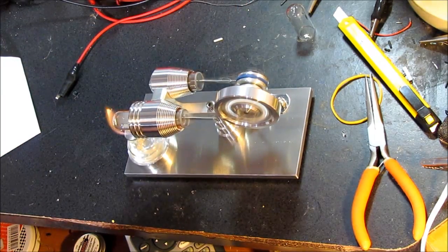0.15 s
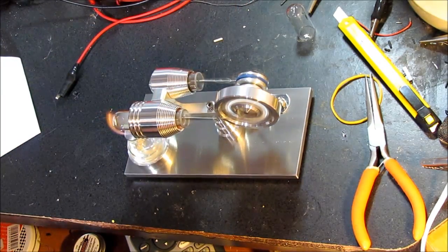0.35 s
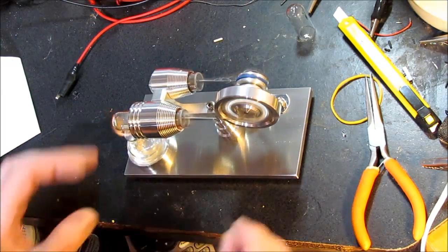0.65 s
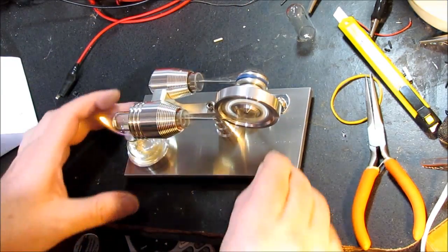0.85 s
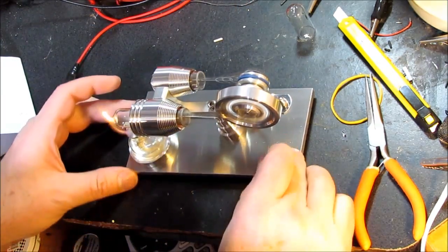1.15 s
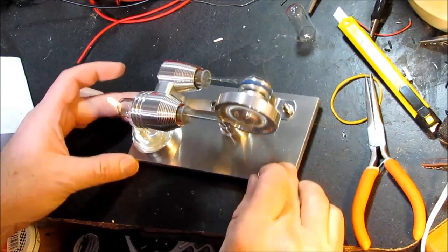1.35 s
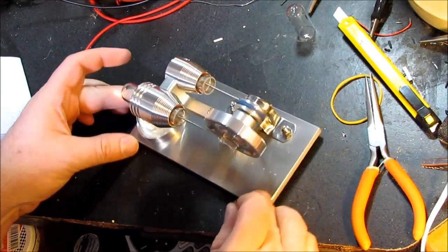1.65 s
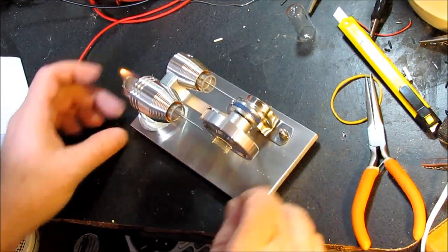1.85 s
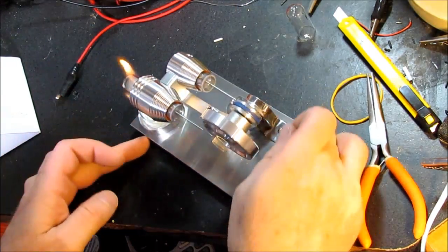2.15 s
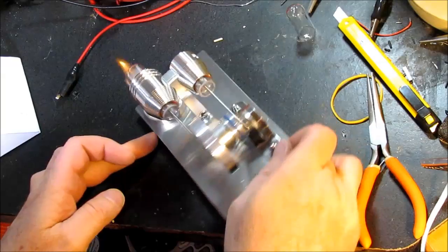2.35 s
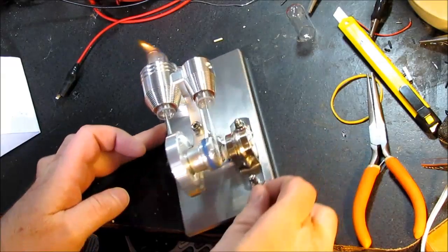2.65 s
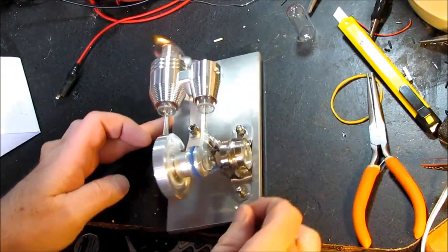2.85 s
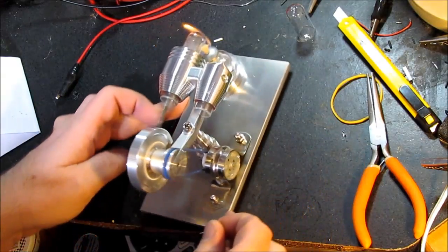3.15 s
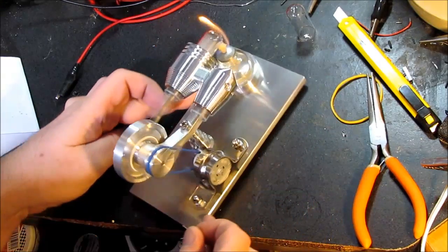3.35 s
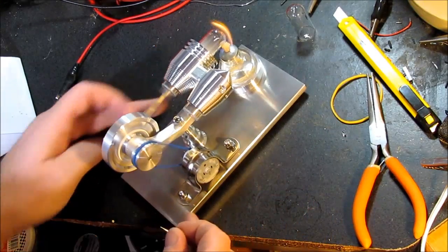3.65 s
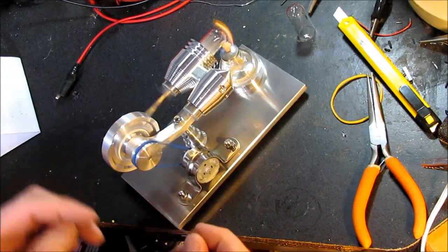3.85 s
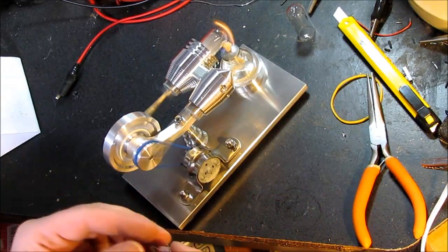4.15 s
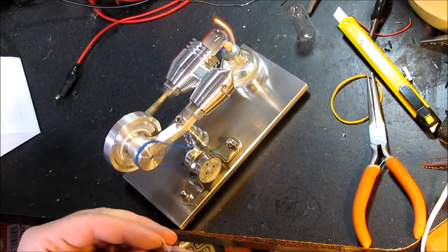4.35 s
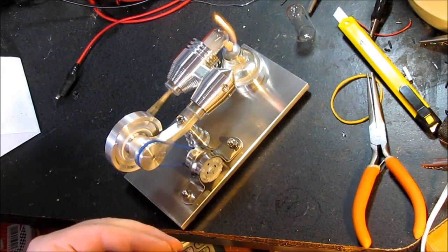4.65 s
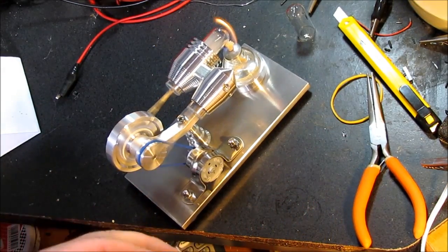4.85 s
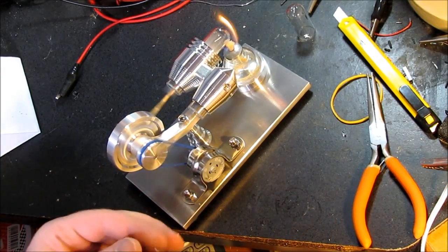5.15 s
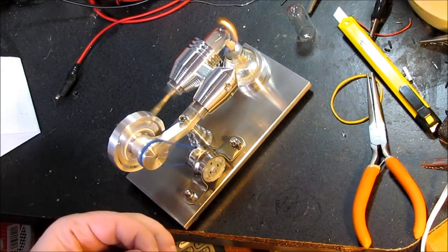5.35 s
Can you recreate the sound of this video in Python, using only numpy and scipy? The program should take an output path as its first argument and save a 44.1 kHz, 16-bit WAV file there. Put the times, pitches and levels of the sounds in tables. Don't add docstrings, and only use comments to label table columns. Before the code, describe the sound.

Fast, dry metallic chatter from a tiny running engine, with faint base scuffs, sharper loose knocks later, and a deepening bench hum.

```python
import sys
import numpy as np
from scipy import signal
from scipy.fft import rfft, irfft, next_fast_len
from scipy.io import wavfile
from scipy.ndimage import uniform_filter1d

SR = 44100
rng = np.random.default_rng(int(sys.argv[2]) if len(sys.argv) > 2 else 0)


def store_pcm(level_fs):
    pcm = np.round(np.clip(level_fs, -1, 1) * 32767).astype(np.int16)
    wavfile.write(sys.argv[1], SR, np.atleast_2d(pcm).T)


def nominal_scale(level):
    x = np.asarray(level, float) / 20
    return 10 ** x


N = 243476

# t/s, pose (0 side-on, 1 half way, 2 fully round)
SWING_ROUND = [(0, 0.1), (1.2, 0), (1.5, 0.66), (2.0, 0.87), (2.5, 1.1), (3.2, 1.4), (3.5, 2.02),
               (5.52, 1.88)]


def crank():
    # t/s, lead/turns
    crank_lead = [(0.0, 0.076), (0.5, 0.086), (1.2, 0.118), (2.4, 0.156), (3.2, 0.25), (4.0, 0.295),
                  (4.4, 0.244), (5.52, 0.039)]
    turns_per_s = 35.53
    return turns_per_s * np.arange(N) / SR + in_time(crank_lead)[0]


def clatter():
    frame_modes = [(133, 0.037, 1, 6, -26), (192, 0.014, 12, -17, 0), (300, 0.096, 1, -5, 2.5),
                   (378, 0.36, -5, -15, -0.5), (463, 0.049, 0.5, -1.5, 2), (530.2, 0.14, 7.5, 1, 6.5),
                   (598.5, 0.21, -5, -6.5, 1.5), (662, 0.043, -5, 0, 2), (774.4, 0.07, 5.5, 2, -0.5),
                   (1043, .025, 7, 5, 2), (1131.5, 0.18, 1, -24, -9), (1347, 0.026, 2, -44, -32)]
    base_modes = [(1480, 0.013, -25, -35, -34), (1582, 0.061, -6, -11, -12), (1907, 0.053, -1, -3.5, -3),
                  (2077, 0.032, 0, 9, 5), (2196, 0.031, 8, 1, 3), (2369, 0.063, 0, 4, 3),
                  (2530, 0.021, 8.5, 11, 6), (2714, 0.12, -2, -6, -18), (2255, 0.031, -19, -13, -9)]
    side_modes = [(3157, 0.02, -6, -5, 1.5), (3432, 0.018, 0.5, 2.5, 5), (3745, 0.033, -2.5, -6, 13),
                  (3960, 0.018, -9, -1.5, -4), (4251, 0.018, -2.5, -1, 8.5), (4970, 0.035, -11, -9, -45)]
    rod_modes = [(5270, 0.032, 6, -1, -2), (5430, 0.039, -23, -30, 0), (5580, 0.015, 21, -4, -9),
                 (5955, 0.012, 20.5, 7, -14), (6033, 0.052, -17, 2, -10), (6165, 0.05, 7.5, -3, -8.5),
                 (5820, 0.02, -3, 8, 1), (6460, 0.0061, 10, 7, -4), (7265, 0.034, 11, 6.5, -4.5)]
    pin_modes = [(11825, 0.016, 17, 17, 6), (12000, 0.034, 8, -13, 11), (11600, 0.018, -38, -28, -26),
                 (12300, 0.028, -39, 10, -23)]
    tick_modes = [(7650, 0.002, 12.5, 5.5, 3), (8530, 0.011, -3, -11.5, -18), (9165, 0.026, -1.5, -10, -20),
                  (9710, 0.0042, 7.5, -4.5, -8), (10550, 0.0067, -26, -6, -18),
                  (12700, 0.0038, -6, -5, -10), (14300, 0.0051, -5, -15, -23),
                  (15700, 0.004, -15, -17, -24)]
    base_db, rods_db, pin_db, tick_db = facing()
    frame = joints(column=1, modes=frame_modes, jitter_ms=.03, uneven_db=.5, bounce_db=-12, rub_db=-42, apart=.3)
    base = joints(column=2, modes=base_modes, jitter_ms=.035, uneven_db=1.0, bounce_db=-3, rub_db=-32, apart=.35)
    side = joints(column=3, modes=side_modes, jitter_ms=.07, uneven_db=2.2, bounce_db=-3, rub_db=-23, apart=.35)
    rods = joints(column=3, modes=rod_modes, jitter_ms=.09, uneven_db=2.2, bounce_db=-2, rub_db=-29, apart=.35)
    pin = joints(column=4, modes=pin_modes, jitter_ms=.1, uneven_db=1.8, bounce_db=-1, rub_db=-36, apart=.3)
    tick = joints(column=5, modes=tick_modes, jitter_ms=.12, uneven_db=2.0, bounce_db=-4, rub_db=-30, apart=.35)
    heavy = nominal_scale(-50.5) * frame + scattered(nominal_scale(base_db - 1.0) * base, amount=0.092)
    middle = scattered(nominal_scale(-38.5) * side + nominal_scale(rods_db) * rods, amount=0.54)
    light = scattered(nominal_scale(pin_db + 1.5) * pin + nominal_scale(tick_db + 2.0) * tick, amount=0.62)
    return heavy + middle + light + glints(np.mean(frame + side + rods, axis=0))


def joints(column, modes, jitter_ms, uneven_db, bounce_db, rub_db, apart):
    # crank angle/turns, frame/dB, base/dB, rods/dB, pin/dB, tick/dB
    joints_before = [(.03, -2, -4, -4, -4, -13), (.13, -2, -7, -3, -5, -15), (.27, -3, -6, -5, -11, -12),
                     (.47, -5, -9, -9, -9, 0), (.51, -9, 0, 0, -10, -8), (.67, -3, -3, -2, -14, -10),
                     (.73, -9, -3, -3, -16, -14), (.93, -6, -1, -3, 0, -7)]
    joints_after = [(.02, 0, -3, -4, -7, -5), (.12, -9, -8, -8, -10, -10), (.27, -10, -7, -7, -11, -6),
                    (.48, -12, -9, -10, 0, -2), (.51, -4, -1, 0, -7, -5), (.67, -9, -3, -1, -11, -4),
                    (.72, -9, -4, -1, -14, -8), (.94, -12, 0, -2, 0, -1)]
    before, after = np.array(joints_before), np.array(joints_after)
    turns, swing = crank(), np.clip(in_time(SWING_ROUND)[0], 0, 2)

    whole = np.arange(-1, int(turns[-1]) + 1)[:, None]
    swung = np.interp(whole, turns, swing)[..., None] / 2
    joint = before + swung * (after - before)
    angle = whole + joint[..., 0]
    inside = (angle > turns[0]) & (angle < turns[-1])
    luck = np.clip(rng.standard_normal(angle.shape), -2, 1.3)
    size = inside * nominal_scale(joint[..., column] + uneven_db * luck)

    habit_ms = np.cumsum(rng.uniform(.3, .9, (len(before), 5)), axis=1)
    habit = nominal_scale(np.r_[0, bounce_db - 2.5 * np.arange(4)]) * rng.choice([-1, 1], habit_ms.shape)
    scatter_ms = jitter_ms * np.cumsum(rng.standard_normal(angle.shape + (5,)), axis=2)
    delay_ms = habit_ms - habit_ms[:, :1] + scatter_ms
    at = np.interp(angle, turns, np.arange(N))[..., None] + delay_ms / 1000 * SR
    at = np.clip(at, 0, N - 1).astype(int).ravel()

    rub = nominal_scale(rub_db) * rng.standard_normal(N)
    rings, heard = [], []
    for hz, t60, *pose_db in modes:
        spot = nominal_scale(.8 * uneven_db * np.clip(rng.standard_normal(scatter_ms.shape), -2, 1.5))
        taps = np.bincount(at, (size[..., None] * habit * spot).ravel(), N)
        pointer = ring(rub + taps, hz, t60)
        gain = np.concatenate([nominal_scale(db) * ports(hz, apart) for db in pose_db])
        rings += [pointer.real, pointer.imag]
        heard += [gain.imag, gain.real]
    poses = (np.transpose(heard) @ np.array(rings)).reshape(3, 2, N)
    blend = sum(pose * np.maximum(1 - abs(swing - k), 0) for k, pose in enumerate(poses))
    return evened(around(blend, modes))


def facing():
    # pose, base/dB, rods/dB, pin/dB, tick/dB
    pose_levels = [(0, -34, -31.5, -34.5, -38), (.7, -35, -33, -38.5, -38),
                   (1.05, -35.5, -32.5, -37, -38.5), (1.27, -33.5, -32, -43.5, -38.5),
                   (1.45, -32.5, -31, -35, -40.5), (1.9, -36.5, -32.5, -39.5, -42)]
    # t/s, length/s, change/dB
    finger_grips = [
        (1.356, 0.47, -1),
        (3.46, 0.9, -2),
        (3.846, 0.33, 1),
    ]
    grip_share = [1.0, 0.48, 1, 0.17]
    swing = in_time(SWING_ROUND)[0]
    grip_db = sum(db * swell(s, length) for s, length, db in finger_grips)
    pose, *parts_db = np.transpose(pose_levels)
    return [np.interp(swing, pose, db) + share * grip_db for db, share in zip(parts_db, grip_share)]


def glints(struck):
    # t/s, length/s, f/Hz, time to die by 60 dB/s, level/dB
    beams = [
        (0.855, 0.31, 6165, 0.031, -39),
        (1.68, 0.46, 4310, 0.023, -45.5),
        (2.75, 0.5, 799, .12, -60),
        (2.9, 0.61, 1210, 0.092, -63),
        (3.113, 0.44, 533, 0.18, -53.5),
    ]
    out = 0
    for s, length, hz, t60, db in beams:
        tone = ring(ring(struck, hz, t60).real, hz, t60 / 2).real
        out = out + nominal_scale(db) * swell(s, length, power=4) * rms_one(tone)
    return out


def loose_part():
    # f/Hz, time to die by 60 dB/s, level/dB, family (0 own, 1 low, 2 mid)
    loose_modes = [(7322, 0.041, 3.5, 0), (7750, .04, -28, 0), (9070, 0.043, -4.5, 0), (9950, 0.002, 6, 0),
                   (8000, 0.0015, 8, 0), (3730, 0.022, 5, 1), (2830, 0.021, -1, 1), (6140, 0.024, 7.5, 2),
                   (5380, 0.015, 2, 2), (6670, 0.0031, 10, 2)]
    s, peak_db, low_db, mid_db = all_knocks().T
    family_db = [0, low_db, mid_db]
    at = (s * SR).astype(int)
    chance = rng.standard_normal((len(s), 2 + len(loose_modes)))
    later = at + ((.008 + 0.0009 * chance[:, 0]) * SR).astype(int)
    rebound_db = -5.5 + 3.0 * np.clip(chance[:, 1], -2, 1)
    out = 0
    for k, (hz, t60, level_db, family) in enumerate(loose_modes):
        size = nominal_scale(peak_db + family_db[int(round(family))] + level_db + 0.91 * chance[:, 2 + k])
        clicks = np.zeros(N + SR)
        clicks[at] = size
        clicks[at + round(.0007 * SR)] = size * nominal_scale(-23)
        clicks[later] = size * nominal_scale(rebound_db)
        phase = np.exp(2j * np.pi * rng.random())
        out = out + np.imag(phase * ports(hz, apart=0.27)[:, None] * ring(clicks[:N], hz, t60))
    return nominal_scale(-4.0) * signal.sosfilt(signal.butter(3, [2000, 14000], "band", fs=SR, output="sos"), out)


def all_knocks():
    # t/s, peak/dB, low ring/dB, mid ring/dB
    stray_knocks = [(0.8315, -32, -4, 7.5), (0.8874, -38, 0, 3), (1.18, -33, 8, 8), (1.211, -32, 2, 8),
                    (1.5239, -29.5, 1, 5), (1.956, -27, -9, -15), (2.5656, -29, -16, 10),
                    (2.5885, -24, -6, -9), (2.7437, -29.5, -2, 2), (2.8958, -21.5, -1.5, -10),
                    (3.052, -34, -16, -3), (3.1078, -34, 8, 7), (3.258, -17, -7.5, -6.5),
                    (3.3722, -17.5, -8.5, -4.5), (3.4575, -20.5, -7, -2), (3.5074, -26, -2, 7),
                    (3.5658, -20.5, -13, -2), (3.6516, -18, -10, -5), (3.7818, -26.5, -13, -22),
                    (4.8334, -28, 0, -4), (5.1781, -26, -10, -2)]
    # from/s, to/s, peak/dB, low ring/dB, mid ring/dB
    knock_spells = [(3.87, 4.16, -24, -9, -3), (4.16, 4.56, -22, -7.5, -4.5), (4.56, 4.77, -22.5, -18, -8),
                    (4.9, 5.06, -23.5, -5, -7), (5.06, 5.11, -22.5, -9, -4), (5.19, 5.51, -23.5, -4, -5)]
    knock_turns, scatter_turns = .98, .04
    peak_uneven_db, ring_uneven_db = 2.0, 4.0
    turns = crank()
    even = np.arange(0, turns[-1] - 1, 2)
    chance = np.clip(rng.standard_normal((len(even), 4)), -1.5, 1.5)
    s = np.interp(even + knock_turns + scatter_turns * chance[:, 0], turns, np.arange(N) / SR)
    uneven_db = chance[:, 1:] * [peak_uneven_db, ring_uneven_db, ring_uneven_db]
    rows = [np.c_[s, db + uneven_db][(s > start) & (s <= end)] for start, end, *db in knock_spells]
    return np.vstack([stray_knocks] + rows)


def bench_hum():
    angle = 2 * np.pi * crank()
    second_db, third_db, fourth_db = shaking()
    hum = nominal_scale(-64.5) * np.cos(angle + 5.6)
    hum += nominal_scale(second_db) * np.cos(2 * angle - 2.9)
    hum += nominal_scale(third_db) * np.cos(3 * angle - 3.0)
    hum += nominal_scale(fourth_db) * np.cos(4 * angle - 1.4)
    buzz = np.cos(5 * angle) + np.cos(7 * angle) + np.cos(8 * angle) + np.cos(10 * angle)
    hum += nominal_scale(-58 + 2.2 * (third_db + 43)) * buzz
    hum += nominal_scale(second_db - 26.5) * (np.cos(5 * angle + 1.2) + np.cos(6 * angle + 0.22))
    return np.sqrt(2) * hum * np.array([[.93], [1.0]])


def shaking():
    # from/s, to/s, multiple 2/dB, multiple 3/dB, multiple 4/dB
    seated_spells = [(1.13, 1.587, -57, -58, -66), (1.902, 1.986, -60, -68, -53),
                     (1.91, 2.33, -53.5, -50, -56.5), (2.784, 2.92, -63, -62, -66),
                     (3.36, 3.57, -50.5, -50.5, -64), (3.575, 3.81, -41.5, -43.5, -55),
                     (3.783, 3.893, -65, -65, -57), (3.83, 5.7, -41, -59, -61.5)]
    soft_feet_db, settle_s = [-65.5, -70.5, -90], 0.055
    wobble_db, wobbles_per_s = [.6, 2.0, 3.0], 9
    t = np.arange(N) / SR
    firm = 0
    for start, end, *db in seated_spells:
        contact = np.clip(.5 + np.minimum(t - start, end - t) / settle_s, 0, 1)
        firm = firm + np.outer(nominal_scale(db), contact)
    knots = np.arange(0, N / SR + 1, 1 / wobbles_per_s)
    wobble = [db * np.interp(t, knots, rng.standard_normal(len(knots))) for db in wobble_db]
    return 20 * np.log10(np.hypot(firm, nominal_scale(soft_feet_db)[:, None])) + wobble


def hands():
    # t/s, length/s, level/dB
    base_nudges = [(0.63, 0.043, -52), (0.857, 0.09, -50.5), (1.16, 0.05, -50), (1.21, 0.044, -52),
                   (2.216, .1, -53), (2.485, 0.053, -52), (3.266, 0.16, -58)]
    stroke = sum(nominal_scale(db) * swell(s, length) for s, length, db in base_nudges)
    grit = rng.standard_normal(N) * nominal_scale(6.7 * rng.standard_normal(N))
    return stroke * rms_one(signal.sosfilt(signal.butter(2, [130, 750], "band", fs=SR, output="sos"), grit))


def workshop(x):
    room_t60_s, wall_cut_hz = 0.28, 14000
    size = next_fast_len(N + SR)
    w = 2 * np.pi * np.arange(size // 2 + 1) / size
    dull = 1 / (1 + 1j * w * SR / (2 * np.pi * wall_cut_hz))
    wet = np.zeros((2, len(w)), complex)
    for k, lag in enumerate(rng.uniform(.003, .022, 12) * SR):
        loop = nominal_scale(-60 * lag / SR / room_t60_s) * dull * np.exp(-1j * w * lag)
        wet[k % 2] += loop / (1 - loop) * (-1) ** (k // 2)
    return irfft(wet * rfft(x.mean(axis=0), size), size)[:, :N] / 2


def room_tone():
    # f/Hz, level per Hz/dB
    air_spectrum = [(20, -1), (35, -4), (80, -2), (200, -9), (600, -8), (2000, -9.5), (9000, -34),
                    (15000, -43)]
    hz = np.maximum(np.arange(N // 2 + 1) * SR / N, 1)
    points = np.array(air_spectrum)
    gain = nominal_scale(np.interp(np.log(hz), np.log(points[:, 0]), points[:, 1], left=-40))
    mid, side = rfft(rng.standard_normal((2, N))) * gain
    side = side * np.clip(0.034 * (hz / 100) ** 0.067, 0, 1)
    return nominal_scale(-53) * rms_one(irfft(np.array([mid + side, mid - side]), N))


def ring(clicks, hz, t60):
    step = nominal_scale(-60 / (t60 * SR)) * np.exp(2j * np.pi * hz / SR)
    return signal.lfilter([1], [1, -step], clicks + 1e-18)


def ports(hz, apart):
    pan, lag = apart * np.sqrt(hz / 6000) * rng.standard_normal(2)
    return np.exp(np.array([1, -1]) * (pan / 8 + 1j * lag))


def around(x, modes):
    edges = [0.91 * modes[0][0], min(1.05 * max(m[0] for m in modes), .45 * SR)]
    return signal.sosfilt(signal.butter(3, edges, "band", fs=SR, output="sos"), x)


def scattered(x, amount):
    knots = N // 120 + 2
    place = np.interp(np.arange(N) / 120, np.arange(knots), rng.standard_normal(knots))
    return x + amount * place * x.mean(axis=0) * [[1], [-1]]


def swell(s, length, power=2):
    return np.exp(-((np.arange(N) / SR - s) / length * 2) ** power)


def in_time(rows):
    s, *columns = np.transpose(rows)
    return [np.interp(np.arange(N) / SR, s, c) for c in columns]


def rms_one(x):
    return x / np.sqrt(np.mean(x ** 2) + 1e-20)


def evened(x):
    power = uniform_filter1d(np.mean(x ** 2, axis=0), size=SR // 2, mode="reflect")
    return x / np.sqrt(power + 1e-20)


def scene():
    engine = (clatter() + loose_part()) * nominal_scale([[-1], [1]])
    return engine + nominal_scale(-13.5) * workshop(engine) + bench_hum() + hands() + room_tone()


def roll_off(x):
    return signal.sosfilt(signal.butter(12, 15960, fs=SR, output="sos"), x)


def record(dry):
    cut = signal.sosfilt(signal.cheby2(20, 60, 15950, fs=SR, output="sos"), dry)
    return roll_off(cut)


dry = scene()
out = record(dry)
store_pcm(out)
```